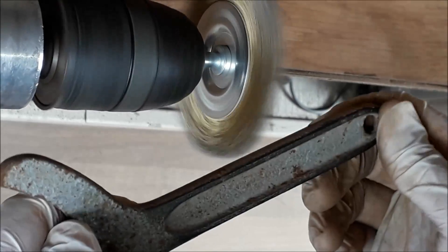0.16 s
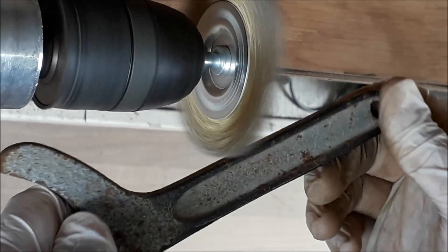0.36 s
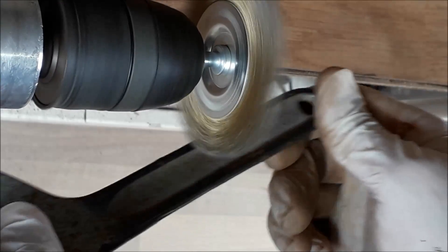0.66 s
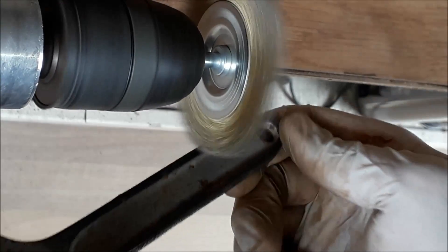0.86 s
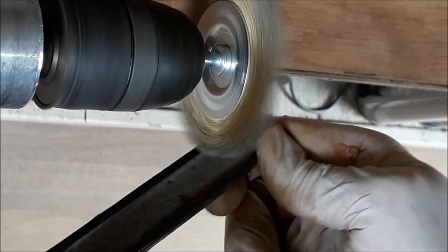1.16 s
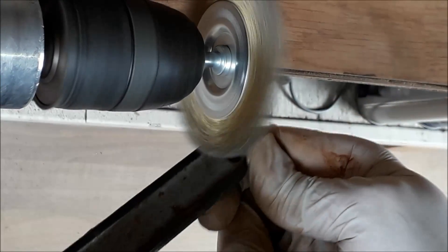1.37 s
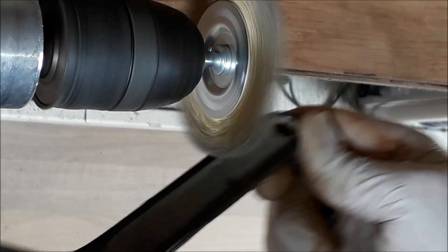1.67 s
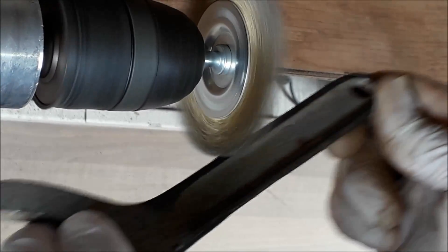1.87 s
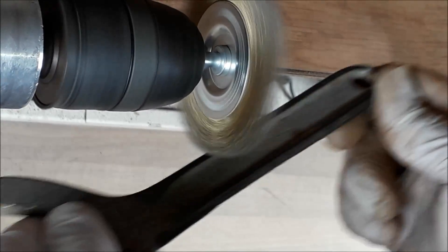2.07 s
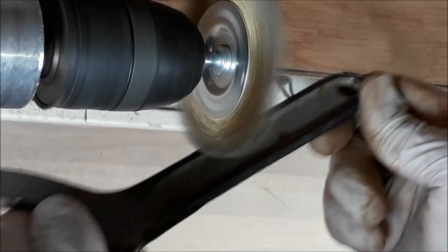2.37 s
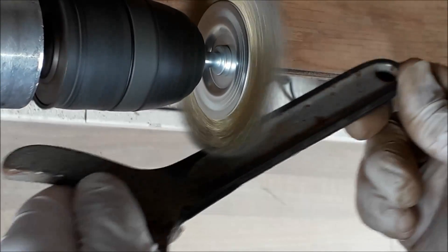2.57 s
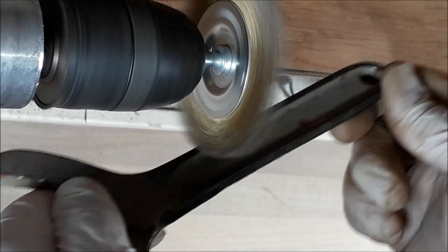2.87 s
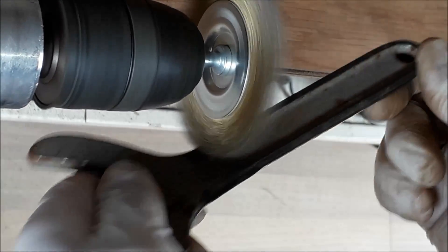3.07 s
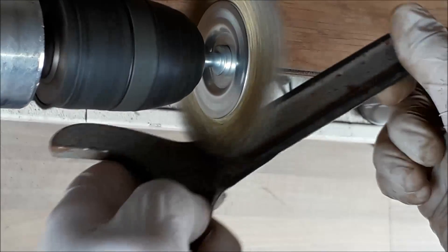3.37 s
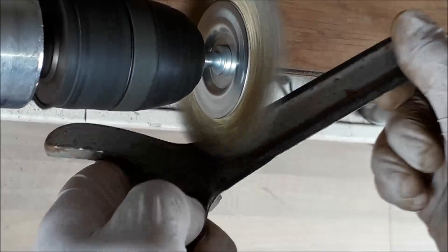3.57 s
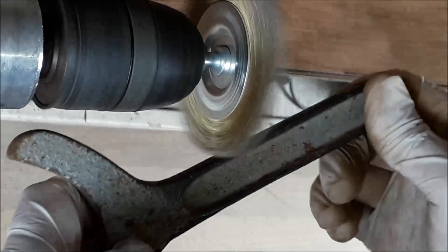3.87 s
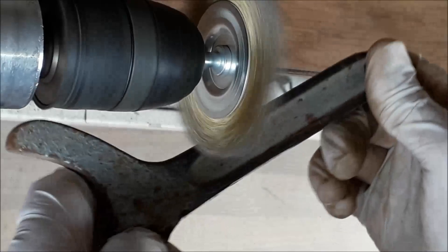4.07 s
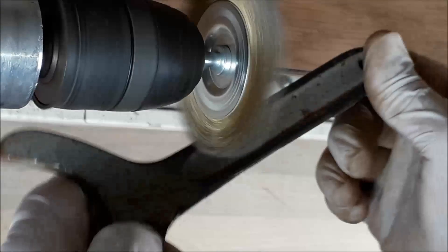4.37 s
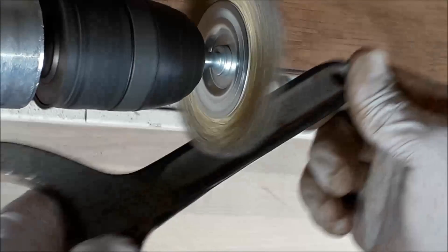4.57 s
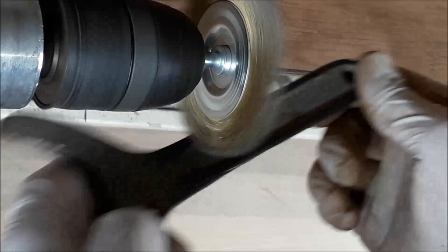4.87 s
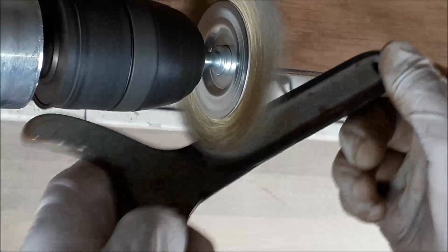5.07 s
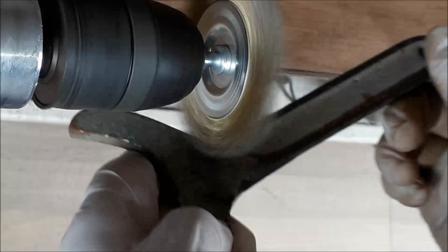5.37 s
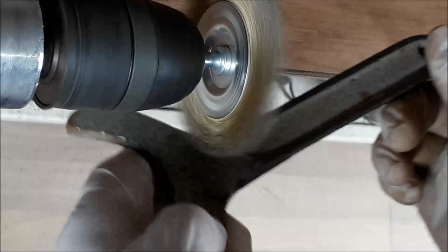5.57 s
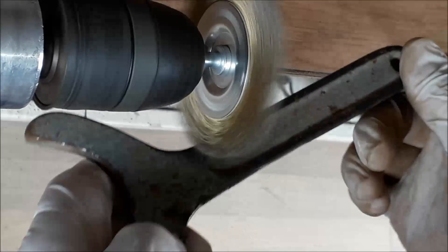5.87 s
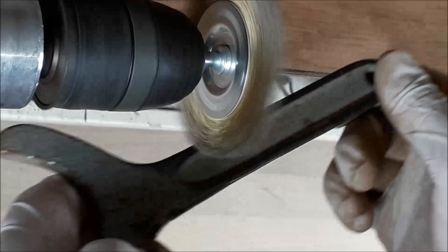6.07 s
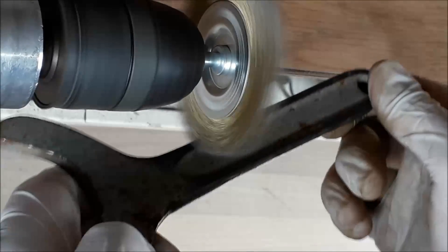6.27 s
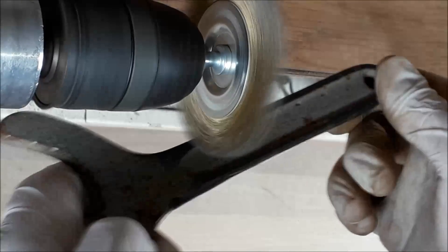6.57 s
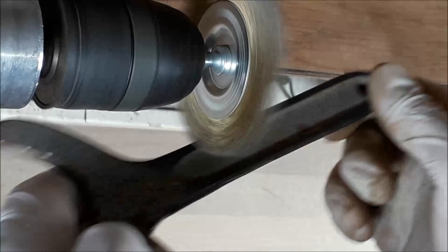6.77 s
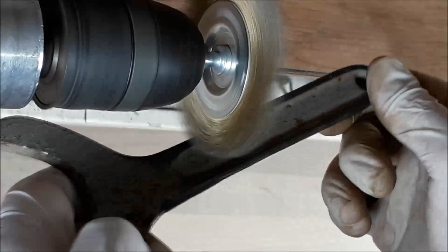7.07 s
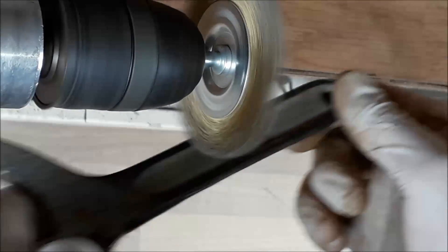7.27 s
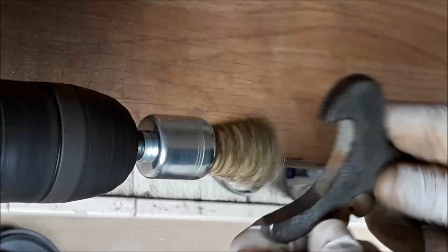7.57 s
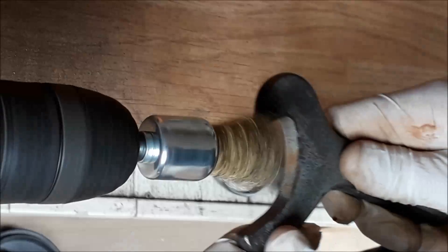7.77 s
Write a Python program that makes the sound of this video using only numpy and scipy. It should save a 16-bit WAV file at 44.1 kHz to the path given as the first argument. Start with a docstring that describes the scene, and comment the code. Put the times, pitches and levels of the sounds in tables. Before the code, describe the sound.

An electric drill runs at full speed in a workshop with a high whine, its wire wheel blowing rumbling gusts onto a close microphone. A rusty steel spanner is pressed against the bristles in two long strokes, hissing, scratching and ringing as the motor whistles louder under pressure. Near the end, a soft thump marks an abrupt change to a small cup brush.

```python
"""A clamped electric drill spins a wire wheel at full speed, and the wheel's draught buffets a close
microphone. A rusty steel spanner touches the wheel, then is pressed on for a long stroke: the bristles
hiss over the steel and make it sing, while the force slows the motor and makes its whistle louder.
Just before 4 s the spanner lifts and the motor races briefly, then a second, harder stroke follows.
At an abrupt cut near the end, a soft low thump sounds and a small cup brush is heard instead."""
import sys
import numpy as np
from scipy import signal
from scipy.fft import rfft, irfft, next_fast_len
from scipy.io import wavfile
from scipy.ndimage import map_coordinates

SR = 44100
rng = np.random.default_rng(int(sys.argv[2]) if len(sys.argv) > 2 else 0)


def to_wav(s):
    """Save 16-bit WAV."""
    ch = np.atleast_2d(s).T  # columns
    pcm = np.round(np.clip(ch, -1, 1) * 32767)  # PCM
    wavfile.write(sys.argv[1], SR, pcm.astype(np.int16))


N = 349713
TIME_S = np.arange(N) / SR
FREE_SPEED_HZ = 394.96  # turns a second of the rotor, the motor's spinning core, with no load
WHEEL_RATIO = .12262  # wheel turns per rotor turn
CUT_S = 7.622  # from here the cup brush is heard instead of the wheel


def amp(db):
    """Turn decibels into a gain to multiply by."""
    return 10 ** (np.asarray(db) / 20)


def unit(x):
    """Scale a signal to an average strength (rms) of 1."""
    return x / np.sqrt(np.mean(x ** 2) + 1e-20)


def curves(rows):
    """Join a table's points over time: one curve for each column after the first."""
    times, *columns = np.transpose(rows)
    return [np.interp(TIME_S, times, column) for column in columns]


def wobble(rate):
    """A smooth random curve that changes about `rate` times a second."""
    knots = rng.standard_normal(int(N * rate / SR) + 4)
    coarse = np.arange(0, N + 32, 32)
    return np.interp(np.arange(N), coarse, map_coordinates(knots, [coarse * rate / SR]))


def filtered(x, response):
    """Multiply each frequency in x by the gain response(hz)."""
    size = next_fast_len(N + SR // 4)
    return irfft(rfft(x, size) * response(np.fft.rfftfreq(size, 1 / SR)), size)[:N]


def coloured(x, spectrum):
    """Shape the bass and treble of x with (frequency_hz, gain_db) points."""
    points_hz, gain_db = np.transpose(spectrum)
    return filtered(x, lambda hz: amp(np.interp(np.log(hz + 1), np.log(points_hz), gain_db)))


def resonance(x, hz, width_hz):
    """Make x ring around one pitch; a narrower width rings longer."""
    return unit(filtered(x, lambda f: 1j * f * width_hz / (hz * hz - f * f + 1j * f * width_hz)))


def cyclic_noise(turns, share):
    """Noise of which a share repeats with every turn of a shaft."""
    size = int(N / turns[-1])
    pattern = signal.resample(rng.standard_normal(size), 16 * size)
    repeating = pattern[(turns % 1 * len(pattern)).astype(int)]
    return np.sqrt(share) * unit(repeating) + np.sqrt(1 - share) * rng.standard_normal(N)


def tone(turns, rough, flutter_rate):
    """A tone that swings once a turn; `rough` sets how much it flutters."""
    angle = 2 * np.pi * ((turns + rng.random()) % 1)
    wave = (1 + rough * wobble(flutter_rate)) * np.sin(angle)
    return unit(wave + rough * wobble(flutter_rate) * np.cos(angle))


def loaded_tones(table, turns, load, rough):
    """Tones that follow the rotor, change level with load and drift; higher ones flutter more."""
    sound = np.zeros(N)
    for multiple, free_db, loaded_db in table:
        level_db = free_db + (loaded_db - free_db) * load + 1.5 * wobble(14)
        sound += amp(level_db) * tone(multiple * turns, rough + .005 * multiple, flutter_rate=35)
    return sound


def workshop_echo(x, echo_db, decay_s):
    """Add the dense, short echo thrown back by the bench and the walls."""
    t = np.arange(SR // 4) / SR
    echo = rng.standard_normal(len(t)) * amp(-60 * t / decay_s)
    return x + amp(echo_db) * signal.fftconvolve(x, echo / np.linalg.norm(echo))[:N]


def thump():
    """A soft, low thump sounds at the cut."""
    return amp(-28) * np.exp(-((TIME_S - CUT_S) / .0035) ** 2)


# How strongly the wheel's draught blows on the microphone: time_s, level_db
DRAUGHT_LEVELS = [(0, -27), (.5, -28.5), (.9, -25.5), (1.6, -30), (2.7, -30), (3.9, -25), (4.4, -27),
                  (4.75, -26), (5.5, -27.5), (6.5, -25), (7.1, -27.5), (7.5, -28), (7.7, -22.5),
                  (7.93, -30)]
# The low rumble of the swirling air: frequency_hz, gain_db
RUMBLE_SPECTRUM = [(20, -38), (45, -35), (70, -15), (100, -4.5), (160, 1), (300, -4), (430, -7),
                   (600, -18.5), (1000, -30.5), (2500, -43)]
# The sharper edges of the gusts: frequency_hz, gain_db
EDGE_SPECTRUM = [(200, -26), (400, -1.5), (550, -2), (750, -3.5), (1100, -14), (3000, -45)]

def draught():
    """Swirls of air off the wheel buffet the microphone; the strongest have the sharpest edges."""
    level_db, = curves(DRAUGHT_LEVELS)
    gusts = amp(7.7 * np.tanh(.72 * wobble(110)) + 2.6 * np.tanh(wobble(25)))
    rumble = unit(coloured(gusts * rng.standard_normal(N), RUMBLE_SPECTRUM))
    edges = unit(coloured(gusts ** 2 * rng.standard_normal(N), EDGE_SPECTRUM))
    return amp(level_db - 1.23) * rumble + amp(level_db - 14) * edges


def small_puffs(count):
    """Pick random times and pitches for lesser puffs, whose strength follows the draught."""
    draught_db, = curves(DRAUGHT_LEVELS)
    at = rng.integers(SR // 20, N - SR // 20, count)
    size, pitch = rng.standard_normal((count, 2)).T
    return list(zip(at / SR, draught_db[at] + 9 - .5 * size, 245 * np.exp(.2 * pitch)))


# The hardest puffs of air: peak_s, level_db, pitch_hz
BIG_PUFFS = [(.023, -10.5, 310), (.071, -8, 318), (.484, -11, 243), (.854, -9, 210), (.978, -5, 285),
             (1.101, -7.5, 320), (1.298, -6, 344), (1.354, -10, 300), (1.51, -10.5, 240), (3.969, -11, 231),
             (4.148, -9, 280), (4.169, -7, 248.1), (4.329, -13, 320), (4.724, -9, 230.2), (5.01, -13, 210),
             (5.329, -9, 399.4), (5.389, -9, 413), (5.439, -10, 400), (5.471, -13, 279), (5.838, -11, 250),
             (6.1, -12, 297), (6.191, -6, 410), (6.432, -8, 363), (6.589, -10, 221), (6.639, -11, 199.9),
             (7.342, -10.5, 250.5), (7.608, -13, 248), (7.625, -10, 272), (7.816, -6, 288),
             (7.912, -5, 248)]

def air_puffs():
    """Single swirls burst on the microphone as dull puffs that rise abruptly and die fast."""
    puffs = np.zeros(N)
    for peak_s, level_db, pitch_hz in BIG_PUFFS + small_puffs(count=26):
        near = slice(max(int((peak_s - .02) * SR), 0), int((peak_s + .03) * SR))
        cycles = (TIME_S[near] - peak_s) * pitch_hz
        shape = np.exp(-np.maximum(-cycles / .36, cycles / .52))
        swing = 2 * np.pi * (cycles + rng.random())
        puffs[near] += amp(level_db + .5) * shape * (np.sin(swing) + .33 * shape * np.sin(2 * swing))
    return coloured(puffs, [(30, -22), (70, -7), (130, .5), (800, -2.5), (2000, -14)])


# The rushing noise inside the motor: frequency_hz, gain_db
RUSH_SPECTRUM = [(100, -21), (650, -22.5), (1100, -9.5), (1420, -10.5), (1620, -1), (1900, -6), (2700, -9),
                 (3150, -0.5), (3500, -7.5), (4800, 0.5), (5900, -2.5), (8900, 3), (10200, -1),
                 (10900, -12), (12100, -12.5), (15000, -5)]

def motor_rush(wheel_turns):
    """Cooling air and the motor's sliding carbon contacts make a steady rush."""
    rush = workshop_echo(cyclic_noise(wheel_turns, share=.1), echo_db=-6.5, decay_s=.36)
    return amp(-19) * unit(coloured(rush, RUSH_SPECTRUM))


# Slow drift in the motor's two clean tones: time_s, whine_db, fan_db
MOTOR_LEVELS = [(0, -22.5, -27), (.55, -23, -27.5), (.8, -23, -22.5), (1.25, -23.5, -28.5),
                (1.55, -25.5, -30), (2.1, -24.5, -28.5), (3.4, -26, -27.5), (3.9, -31, -27.5),
                (4.05, -26, -27.5), (4.4, -26.5, -26.5), (4.9, -22.5, -25.5), (5.55, -25, -27),
                (6.2, -25.5, -28.5), (7.25, -27.5, -29), (7.68, -26, -30.5), (7.82, -28, -37),
                (7.93, -30.5, -36)]
# The rotor's overtones: multiple_of_rotor_speed, free_db, loaded_db
ROTOR_TONES = [(2, -45, -46), (10, -43, -38), (14, -35, -34), (16, -39, -35), (20, -36, -27),
               (24, -33, -38)]

def motor(turns, speed_hz, force, load, racing):
    """Fan blades and slots in the rotor make clean tones; one overtone stands out while it races."""
    fan_blades, slots = 4, 8
    whine_db, fan_db = curves(MOTOR_LEVELS)
    fan_db += 2 * (speed_hz - FREE_SPEED_HZ)  # the fan fades as the rotor slows
    fan = amp(fan_db) * tone(fan_blades * turns, rough=.092, flutter_rate=40)
    whine = amp(whine_db - 3.5 * force) * tone(slots * turns, rough=.08, flutter_rate=35)
    overtones = amp(1.6) * loaded_tones(ROTOR_TONES, turns, load, rough=.14)
    race_tone = racing * amp(-31) * tone(14 * turns, rough=.16, flutter_rate=42)
    return fan + whine + overtones + race_tone


# Tones of the gears and bearings: multiple_of_rotor_speed, free_db, loaded_db
GEAR_TONES = [(1.158, -53, -40), (2.221, -42, -46), (4.082, -47, -42), (4.211, -39, -38), (4.334, -54, -41),
              (5.779, -40, -43), (6.221, -41, -45), (7.216, -39, -38), (7.85, -40, -38), (8.164, -40, -36),
              (8.668, -52, -40), (9.744, -48, -38), (14.433, -36, -37), (15.782, -39, -37),
              (16.831, -48, -37), (17.22, -38, -44), (19.557, -35, -39), (19.782, -22, -29.5),
              (20.218, -37, -21.5), (21.642, -26, -27), (21.779, -33, -36), (22.249, -33, -33),
              (23.782, -32, -33), (24.17, -42, -32), (24.273, -41, -36), (26.221, -31.5, -39),
              (27.782, -42, -48), (28.218, -47, -42), (28.859, -48, -44), (36.075, -45, -52)]

def gears(turns, load):
    """Gear teeth and bearings make a cluster of tones whose balance shifts with the load."""
    return amp(-.54) * loaded_tones(GEAR_TONES, turns, load, rough=.12)


def whistle(turns, force, racing):
    """The commutator, the motor's spinning switch, whistles louder under force and while racing."""
    force_db = 22 * np.tanh(force / .66)  # levels off when pressed hard
    level_db = -34.5 + force_db + 15 * racing + 1.2 * wobble(16)
    return amp(level_db) * tone(24.218 * turns, rough=.17, flutter_rate=100)


# Tones that come with the cup brush: multiple_of_rotor_speed, level_db
CUP_BRUSH_TONES = [(2.405, -47), (3.782, -36), (5.785, -34.5), (8.226, -35), (17.438, -38), (19.223, -36),
                   (21.642, -28), (22.218, -34), (23.782, -31)]

def cup_brush(turns, cup_on):
    """After the cut, the spinning cup brush is heard with tones of its own."""
    return cup_on * sum(amp(level_db) * tone(multiple * turns, rough=.22, flutter_rate=22)
                        for multiple, level_db in CUP_BRUSH_TONES)


def steel_song(wheel_turns, beat):
    """Wire tufts strike near a pitch at which the steel rings, so it sings in two swells a turn."""
    tufts_per_turn = 103
    rubbing = cyclic_noise(wheel_turns, share=.088) * amp(1.4 * beat)
    swells = np.cos(2 * np.pi * wheel_turns + .2 * wobble(70)) + .18  # the offset makes them unequal
    strikes = tone(tufts_per_turn * wheel_turns, rough=.25, flutter_rate=40) * swells
    rubbed_ring = amp(-6.8) * resonance(rubbing, hz=4860, width_hz=140)
    struck_ring = amp(1.3) * resonance(strikes, hz=4940, width_hz=260)
    return rubbed_ring + struck_ring


# How the sound changes as the spanner shifts under the wheel: time_s, scrape_db, sing_db, hum_db
SPANNER_LEVELS = [(.6, -18, -29, -49), (.83, -17, -27, -34), (1.1, -18.5, -28.5, -34.5),
                  (1.4, -20.5, -34, -39), (1.65, -20, -26.5, -39), (2.1, -18.5, -29.5, -36),
                  (2.65, -17.5, -25, -32), (3.35, -22, -25.5, -39), (3.7, -21.5, -24, -40),
                  (4.1, -19.5, -31, -43), (4.35, -19, -26, -31), (4.55, -18.5, -22.5, -36),
                  (4.9, -19.5, -25, -38), (5.3, -19, -23.5, -39), (6.3, -20, -22.5, -34.5),
                  (7.6, -19.5, -24.5, -37)]
# The hiss of wire on rusty steel: frequency_hz, gain_db
SCRAPE_SPECTRUM = [(300, -28), (750, -7), (1100, -15.5), (1900, -8), (2700, -9.5), (3170, -1), (3550, -6),
                   (3950, 3), (4300, -5.5), (4750, 3), (5450, 2.5), (5900, -3), (6500, -0.5), (10000, 0.5),
                   (10900, -11), (12300, -11), (14800, -12.5)]

def brushing(turns, contact, force, cup_on):
    """Wire tips scratch the spanner and make it sing, while the loaded drill body hums."""
    scrape_db, sing_db, hum_db = curves(SPANNER_LEVELS)
    wheel_turns = turns * WHEEL_RATIO
    angle = 2 * np.pi * wheel_turns
    beat = .31 * np.cos(angle) + np.cos(2 * angle)  # the uneven wheel hits harder twice a turn
    grip_db = .28 * wobble(18)  # the hands never hold quite still
    scratches = workshop_echo(cyclic_noise(wheel_turns, share=.13), echo_db=-4.5, decay_s=.14)
    scratches *= amp(.26 * beat + 1.3 * wobble(500))
    hiss = contact * amp(scrape_db + 1.5 * force + grip_db) * unit(coloured(scratches, SCRAPE_SPECTRUM))
    song = contact ** 2 * (1 - cup_on) * amp(sing_db + grip_db) * steel_song(wheel_turns, beat)
    hum = (contact ** 2 + .065) * amp(hum_db) * tone(turns, rough=.55, flutter_rate=44)
    return hiss + song + hum


# The spanner held against the bristles: start_s, end_s, contact_0_to_1, force_0_to_1
SPANNER_STROKES = [(.24, .56, .36, .06), (.56, 3.735, 1, .28), (4.05, 7.6, .96, .56), (7.61, 8, .62, .3)]
# Brief shoves within a stroke (below 0 the hands ease off): middle_s, length_s, extra_force
HAND_SHOVES = [(0.774, 0.29, 0.42), (0.982, 0.41, .32), (1.526, .26, 0.28), (1.78, .2, .45),
               (2.07, .2, -0.16), (2.34, .15, 0.38), (2.571, 0.098, 0.63), (2.83, .22, .3),
               (3.071, .13, 0.32), (3.472, .11, 0.28), (3.66, .13, 0.61), (4.259, .2, 0.41),
               (4.47, .4, 0.28), (4.82, .11, 0.28), (4.897, 0.087, -0.27), (5.052, .1, -.15),
               (5.207, 0.11, 0.19), (5.38, 0.098, 0.235), (5.49, .16, -0.29), (5.9, 0.099, -.3),
               (6.03, 0.27, 0.4), (6.42, .12, 0.28), (6.68, .3, 0.21), (7.301, .12, -0.14),
               (7.768, 0.15, .3), (7.901, .16, -0.23)]

def hands():
    """Contact and force over time: each stroke bites, holds and lets go, with shoves and a tremble."""
    attack_s, release_s = .035, .025
    contact, force = np.zeros(N), np.zeros(N)
    for start_s, end_s, share, push in SPANNER_STROKES:
        bite = 1 - np.exp(-np.maximum(TIME_S - start_s, 0) / attack_s)
        held = bite * np.exp(-np.maximum(TIME_S - end_s, 0) / release_s)
        contact += share * held
        force += push * held
    shoves = sum(extra * swell(middle_s, length_s) for middle_s, length_s, extra in HAND_SHOVES)
    tremble = .0516 * contact * wobble(18)
    return contact, np.maximum(force + shoves + tremble, 0)


def swell(middle_s, length_s):
    """A smooth rise to 1 and fall back to 0."""
    return np.cos(np.pi * np.clip((TIME_S - middle_s) / length_s, -.5, .5)) ** 2


def scene():
    """The hands slow the rotor and the drill's tones follow; one microphone feeds both channels."""
    warming_hz_per_s, sag_hz, race_hz = .25, 3.8, .8
    contact, force = hands()
    load = np.clip(contact ** 2 * (.51 + .7 * force), 0, 1)
    racing = swell(middle_s=3.85, length_s=.3334)  # between the two strokes
    cup_on = np.clip((TIME_S - CUT_S) / .0049, 0, 1)  # 0 with the wheel, 1 with the cup brush
    speed_hz = FREE_SPEED_HZ + warming_hz_per_s * TIME_S - sag_hz * force + race_hz * racing
    jerks_hz = .25 * contact * wobble(25)  # bristles snag on the steel
    turns = np.cumsum(speed_hz + jerks_hz) / SR
    loose_turns = turns + .00075 * wobble(130)  # slack between gear teeth smears the high tones
    mono = thump() + draught() + air_puffs()
    mono += motor_rush(turns * WHEEL_RATIO) + motor(turns, speed_hz, force, load, racing)
    mono += gears(loose_turns, load) + whistle(loose_turns, force, racing)
    mono += cup_brush(loose_turns, cup_on) + brushing(turns, contact, force, cup_on)
    return np.array([mono, mono])


def record(dry):
    """Cut away the very highest treble."""
    return np.array([filtered(channel, lambda hz: hz < 15750) for channel in dry])


dry = scene()
out = record(dry)
to_wav(out)
```